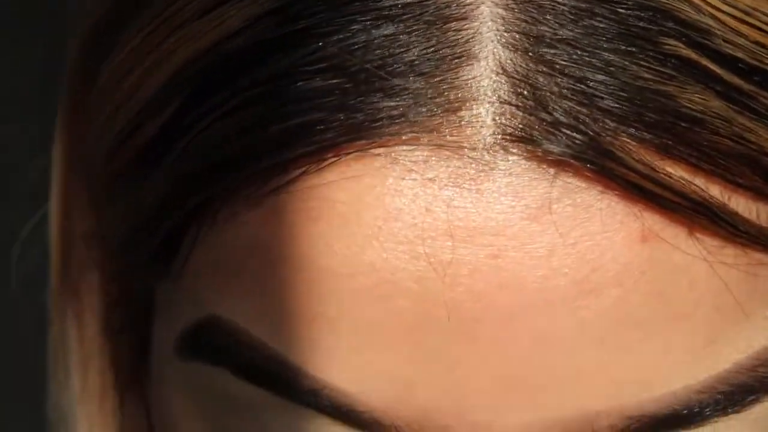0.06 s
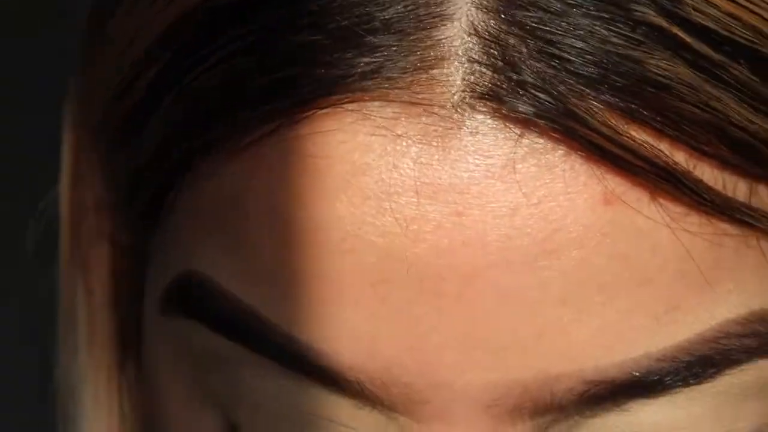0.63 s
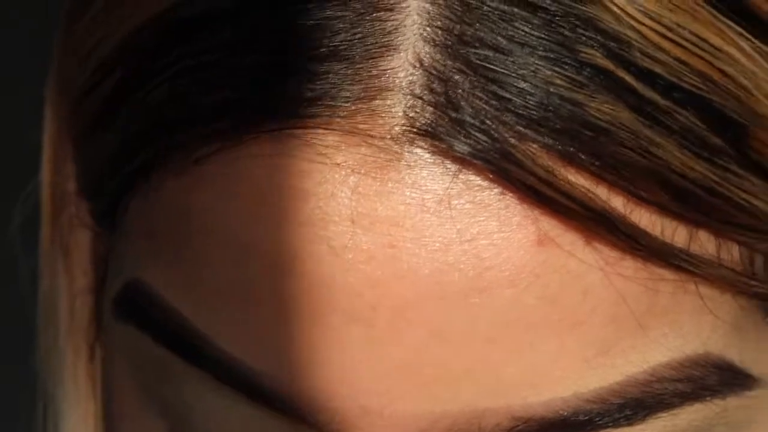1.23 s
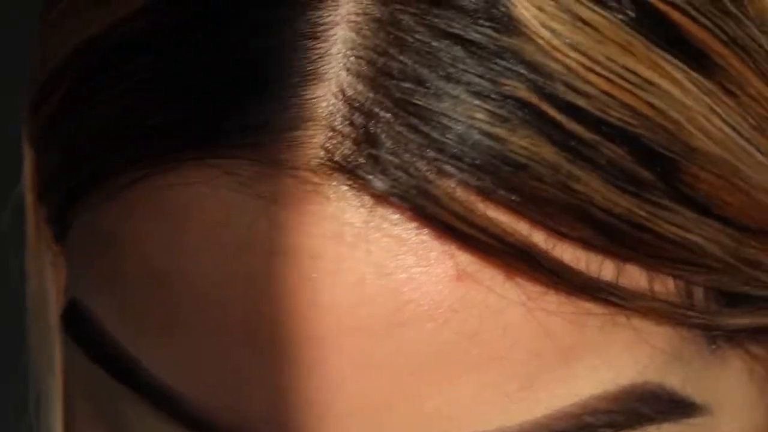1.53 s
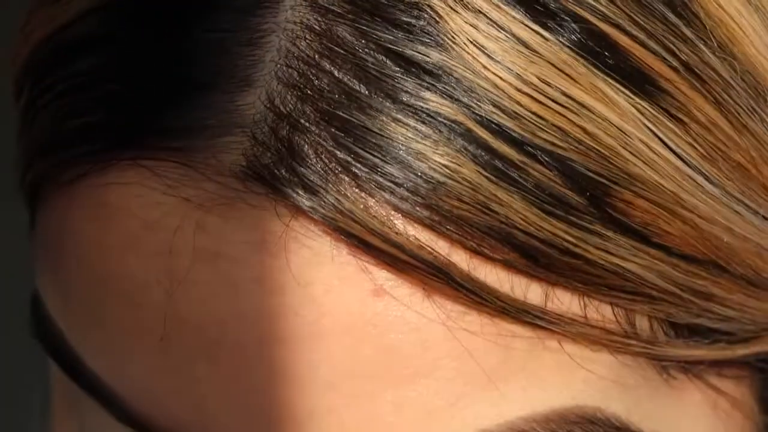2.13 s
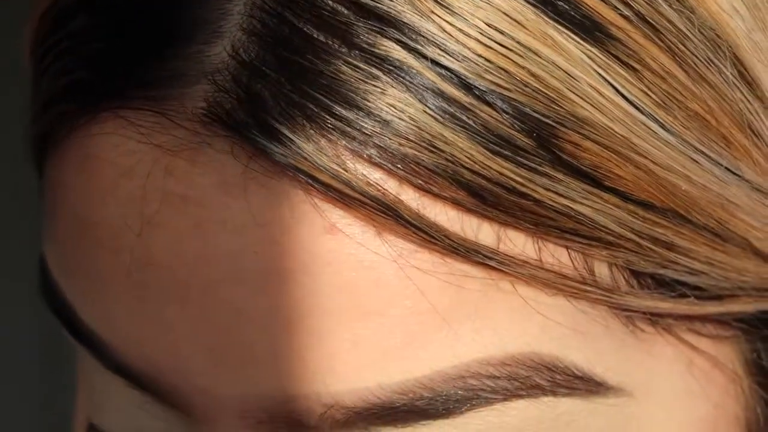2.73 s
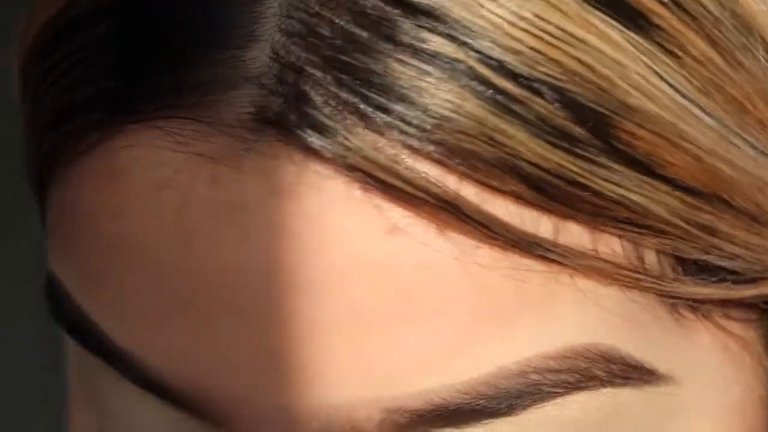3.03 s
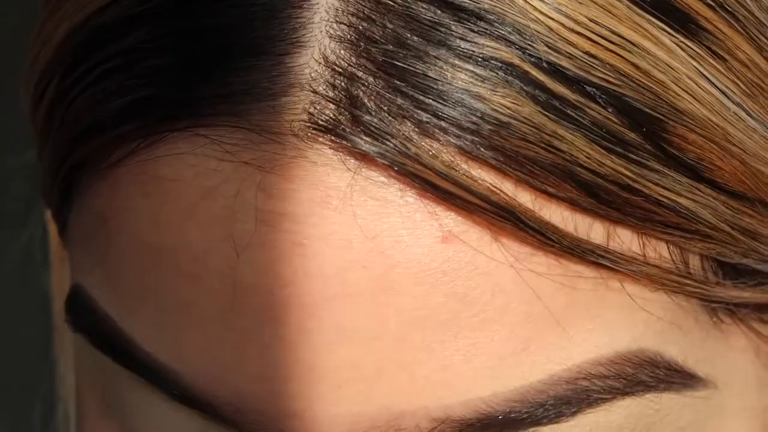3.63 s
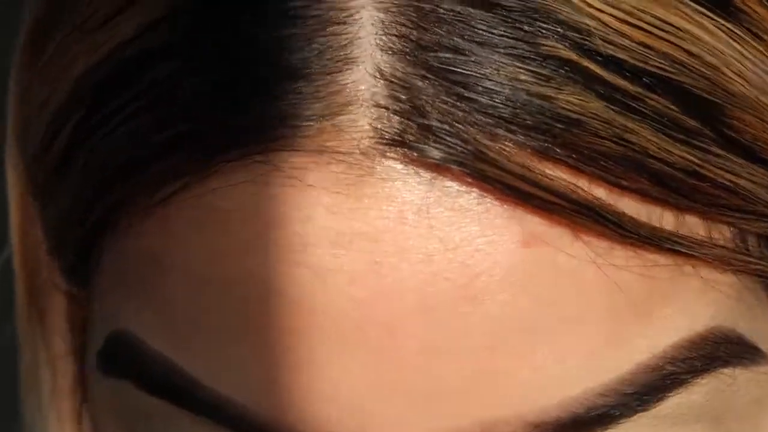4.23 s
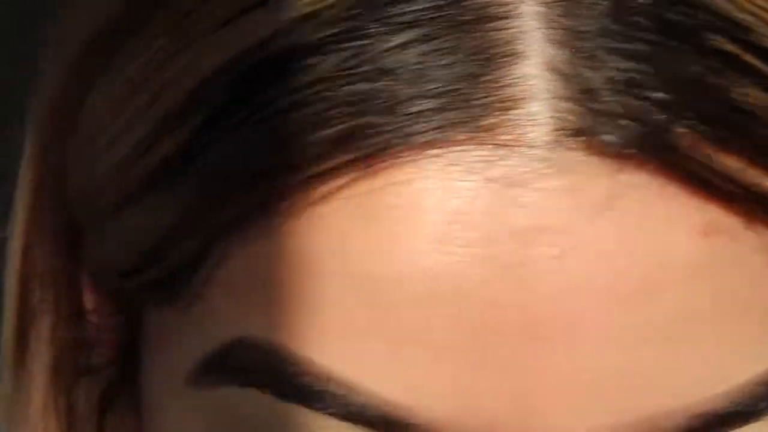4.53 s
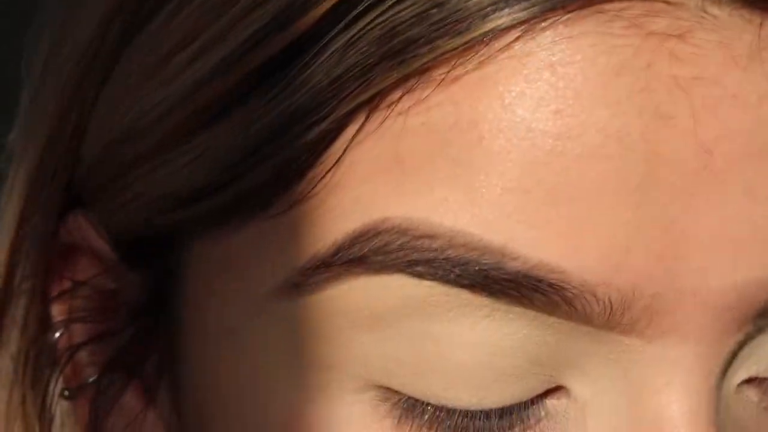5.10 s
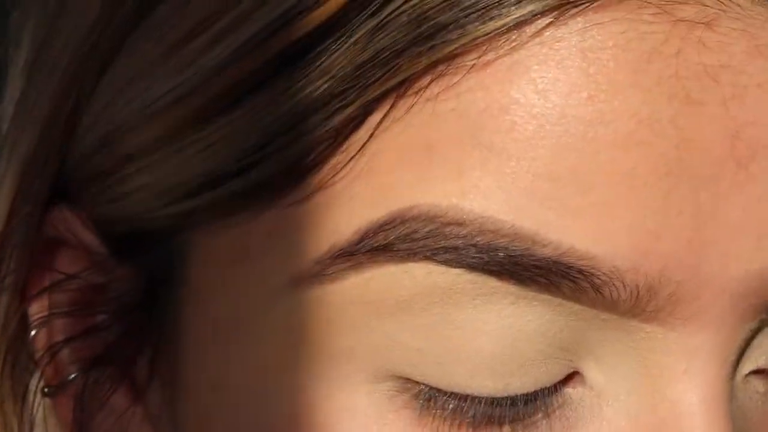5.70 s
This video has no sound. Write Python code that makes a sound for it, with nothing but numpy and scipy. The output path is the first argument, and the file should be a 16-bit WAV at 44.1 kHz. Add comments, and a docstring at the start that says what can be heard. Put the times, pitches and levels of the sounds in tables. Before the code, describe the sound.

Close by in a small, quiet room, plastic make-up cases are rummaged through on a hollow desk. A tub lands with a heavy, booming knock, then a palette clatters down. Cases click together, scrape and squeak as they slide, with soft thuds from the desk. Near the end a lid is tapped and a small jar is set down with a quick double knock, over faint room noise and a low hum.

```python
"""At a hollow desk in a small, quiet room, plastic make-up cases are rummaged through close by.
They click as they meet, and scrape and squeak as they slide; the desk knocks and booms under them.
A tub lands heavily, then a palette clatters down. Near the end a lid is tapped and a small jar is set
down with a double knock. Each rings with its own fading tones, over room noise and a low motor hum.
Stereo is built from a mid signal (what both ears share) and a side signal (how they differ)."""
import sys
import numpy as np
from scipy import signal
from scipy.fft import rfft, irfft, next_fast_len
from scipy.io import wavfile
from scipy.ndimage import uniform_filter1d, map_coordinates

SR = 44100
rng = np.random.default_rng(int(sys.argv[2]) if len(sys.argv) > 2 else 0)


def generate_wav(signal):
    """Clip the signal to [-1, 1] and save it as 16-bit WAV at the path in sys.argv[1]."""
    frames = np.transpose(np.atleast_2d(signal))
    scaled = np.clip(frames, -1, 1) * 32767
    pcm = np.round(scaled).astype(np.int16)
    wavfile.write(sys.argv[1], SR, pcm)


N = 262833
HIT = 16384  # samples in one short sound
HIT_HZ = np.fft.rfftfreq(HIT, 1 / SR)
HIT_T = np.arange(HIT) / SR

# Cases are dragged. Each row: start and length in seconds, then scrape, rumble and swell in dB.
SLIDES = [(0, 0.27, -55.5, -52.5, -4.5), (0.324, 0.049, -36, -34, -5.5), (1.16, 0.25, -54.5, -72, 13),
          (1.411, 0.16, -43.5, -53, -15.5), (1.985, 0.16, -51.5, -71, 10.5),
          (2.221, 0.12, -52.5, -56.5, -2), (2.422, 0.14, -54.5, -60, 11), (2.61, 0.059, -42.5, -45, 8.5),
          (2.749, 0.23, -50, -55, -17), (2.938, 0.3, -48.5, -50.5, -4.5), (3.237, 0.07, -42.5, -69, 3),
          (3.301, 0.044, -42, -40, -6.5), (3.387, 0.097, -39, -60, 6.5), (3.516, 0.026, -56, -70, -5),
          (3.768, 0.19, -69, -49.5, 13.5), (4.015, 0.064, -81, -47.5, -1.5),
          (4.738, 0.063, -60, -45.5, -14), (5.337, 0.42, -55.5, -56.5, -1), (5.67, 0.3, -64, -62, -13)]
# The tone colour of a scrape, the desk's rumble and the still room. Each row: frequency in Hz, level in dB.
SCRAPE_COLOUR = [(350, -84.5), (600, 7), (715, -17.5), (785, 0), (1090, 4.5), (1480, 3), (2790, 0.5),
                 (4770, -13), (5180, -12.5), (8640, -21), (10700, -33.5), (12100, -27), (15000, -36.5)]
RUMBLE_COLOUR = [(30, -49), (70, -2.5), (125, 6), (190, -7), (280, 2), (400, -3.5), (560, -9.5),
                 (800, -16.5), (1500, -57), (5000, -71)]
AIR_COLOUR = [(12, -25), (25, 2.5), (42, 0), (59, 0.5), (103, -8.5), (270, -10), (433, -12), (497, -11),
              (555, -16.5), (1310, -20), (1420, -20.5), (1730, -22.5), (2410, -24.5), (3860, -26.5),
              (11800, -42), (13000, -50), (14500, -65)]
# Sliding cases catch and sing. Each row: start and length in seconds, first pitch in Hz, level in dB.
SQUEAKS = [(0.247,0.034,368,-30), (0.29,0.027,356,-30), (0.33,0.053,371,-28.5), (0.419,0.03,557,-22),
           (0.423,0.04,354,-19.5), (0.915,0.05,112,-33), (0.965,0.07,102.8,-43), (1.407,0.033,3510,-34),
           (1.445,0.03,2867,-29.5), (2.631,0.048,1110,-35), (3.308,0.067,3030,-31), (3.387,0.032,1940,-33),
           (3.457,0.03,2340,-32), (3.512,0.045,1392,-36), (3.785,0.06,118,-43), (3.88,0.094,280,-45),
           (4.0,0.026,255,-42), (4.065,0.12,117.7,-42.5), (4.757,0.036,230,-39.5)]
# A case meets the desk or another case. Each row: start in seconds, strength in dB, the case's main
# resonance in Hz, then weight on the desk, hardness and looseness in dB.
CONTACTS = [(0.2511,-10.5,1170,-2.5,3.5,4.5), (.285,-39,2380,-4,18.5,12), (0.298,-27,2400,-6,6,2),
            (0.3129,-14.5,2670,3.5,9.5,2), (0.3182,-7.5,1470,-13,-10,5), (0.33,-14,1350,-6,-2,0),
            (0.338,-12,1000,-13,2,6), (0.382,-15,1300,9.5,2,4.5), (0.3914,6,760,7,-4,-2.5),
            (.4,-1.5,725,-1,-6,1.5), (0.438,-9,930,-26,2.5,4), (0.449,-22,980,12,10,-7),
            (.713,-26,890,-3,-13,-1.5), (0.8734,-1.5,1300,-9,-12,-5), (1.251,-29,2170,-4,-16,7.5),
            (1.328,-20.5,2090,-20,-12,0), (1.356,-1.5,1340,-8.5,-7,-1.5), (1.4007,-16,1040,-9,-2,6),
            (1.4359,1.5,1840,-9,1.5,1), (1.4694,-0.5,1550,-5,8.5,-2), (1.4828,-10,950,-14,-1,5),
            (1.522,-17,1390,-0.5,-17,5), (1.6117,-27.5,2670,-2.5,10,1), (1.975,-29.5,3060,-3,7.5,6.5),
            (1.9881,-7.5,1490,-8,-12,-4), (2.0191,-9.5,1740,-11,3.5,-4.5), (2.043,-19.5,2450,-8,11.5,-4),
            (2.12,-20,1720,-5.5,6.5,-4), (2.151,-25,2200,-8,-8,-12), (2.4957,-19,2250,-11.5,2,-4.5),
            (2.539,-24.5,1700,-20,9,-4), (2.584,-26.5,2330,-7,12.5,13), (2.59,-14.5,2460,-9.5,2.5,-2),
            (2.599,-25,2000,0,8,-2), (2.6376,-19,1710,-12,9,3), (2.665,-19,1150,-10,3,-3),
            (2.7612,-8.5,1720,-15,0,-2), (2.8117,-10.5,1460,-14,4.5,-5), (2.8728,-34,2000,1,0,-8),
            (2.966,-16,1940,-7.5,-13,-1), (2.999,-25,1700,-6,-2,-1), (3.0713,-4.5,1540,-13.5,2.5,-0.5),
            (3.164,-22.5,1980,-10,-15,3), (3.2081,-14,2440,-5.5,3,-4), (3.2694,-21,2320,-26,7,5),
            (3.3,-11.5,1810,-9,11,2.5), (3.3174,-3,2130,-17,-12,-0.5), (3.335,-15.5,1500,2.5,9,-6),
            (3.375,-19.5,2000,-5,8.5,3), (3.4364,-25,1700,-4,9,3), (3.471,-28,2300,-2,-2,6),
            (3.482,-20,2220,-12,7,6.5), (3.5092,-14,1440,-29,-2,3.5), (3.529,-21.5,1730,-19,6,5),
            (3.55,-13.5,1210,-1.5,1,3), (3.996,-28,2220,-9,6.5,-1.5), (4.155,-28,1220,-10,-1,-5),
            (4.4659,-21,520,14.5,-18.5,0), (4.477,-10.5,1020,-5.5,1.5,5.5), (4.602,-23,520,12,4,4.5),
            (4.617,-6.5,2440,-2,9,0), (4.624,-17,1060,9,-10,0.5), (4.731,-31.5,1340,5,-17,-15),
            (5.106,-32.5,1890,-2,-2,-4), (5.332,-26.5,940,-24,-1.5,3.5), (5.38,-34,2700,-1,19,5.5),
            (5.408,-29.5,2530,-2,13,1), (5.5779,-6,940,-9,-5,2), (5.583,-4.5,1100,-3.5,9,-0.5),
            (5.5884,-14,1250,5.5,-1,-17), (5.8863,-34,2800,4.5,19.5,1)]
# The tone colour of each struck part. Each row: frequency in Hz, level in dB.
DESK_THUMP = [(25, 1), (65, 8.5), (125, 9.5), (200, -3), (330, -22), (1200, -91)]
DESK_KNOCK = [(90, -50), (190, -8), (250, 1.5), (340, 2), (410, -1), (560, -2), (760, -3), (1300, -46),
              (5000, -74)]
CASE_SHELL = [(200, -37), (700, 4.5), (1200, 5.5), (2000, 4.5), (3000, -5), (4500, -19), (9000, -66)]
CASE_RIM = [(900, -41), (1900, -3), (2500, 5.5), (3300, 1), (4200, -6.5), (5500, -18), (9000, -74),
            (16000, -75)]
CASE_EDGE = [(2500, 2), (4800, 0), (6500, -3), (8500, -11.5), (10500, -16), (13000, -15.5), (14500, -21),
             (15500, -40)]
# Modes are the tones a struck thing rings with. Each row: pitch in Hz, level in dB, ring time in seconds.
# Ring time (t60) is how long a sound takes to fade by 60 dB.
DESK_MODES = [(133, -5, 0.16), (248.6, 3, 0.11), (342, 0.5, 0.27), (467, 3, 0.19), (512, -7, 0.2),
              (582, -0.5, 0.18), (721, -5, .1), (883, 0.5, 0.12), (1053, -1, 0.13)]
TUB_MODES = [(718, -23.5, 0.088), (885, -26, 0.14), (1380, -23.5, 0.05), (1580, -36, 0.05),
             (1703, -27.5, 0.11), (2020, -34, 0.084), (2850, -30, 0.08)]
PALETTE_MODES = [(644, -40, 0.071), (1082, -19.5, 0.1), (1250, -35, 0.084), (1425, -22, 0.075),
                 (1610, -30, 0.12), (2080, -35, 0.046), (2460, -27.5, 0.098), (2850, -44, .1),
                 (3300, -24, 0.072)]
LID_MODES = [(462, -25.5, 0.046), (574, -20, 0.022), (2025, -31.5, 0.041), (2460, -37, 0.045),
             (2670, -29.5, 0.052), (3300, -25.5, 0.026)]
JAR_MODES = [(325, -2, 0.073), (469, 2, 0.13), (675, 13.5, 0.035), (688, -1.5, 0.15), (745, 4.5, 0.07),
             (940, -8, 0.063), (1068, 15.5, 0.15), (1093, 15.5, 0.049), (1200, -8, 0.16),
             (1255, 8.5, 0.074), (1421, -25, 0.14), (1920, -8, 0.054), (2050, -16, .12), (2185, -5, 0.054),
             (2580, -2, 0.037), (2975, -4, 0.078), (3060, -8, 0.053), (3327, -16, 0.19)]
# The knocks each thing takes. Each row: start in seconds, strength in dB.
TUB_BLOWS = [(0.2527, -14.5), (0.3184, -2), (0.338, -5.5), (0.395, 2)]
PALETTE_BLOWS = [(1.4375, -4.5), (1.4718, -3), (1.523, -14.5)]
LID_TAPS = [(5.381, 0.5), (5.3892, -18), (5.408, -11)]
# The jar's knocks. Each row: start in seconds, strength in dB, lowest pitch that rings well in Hz.
JAR_BLOWS = [(5.579, -19.5, 1000), (5.5832, -23, 300), (5.718, -39, 2850)]
# Single ringing tones. Each row: start in seconds, pitch in Hz, level in dB, ring time in seconds.
CASE_PINGS = [(0.2536,1350,-12.5,0.015), (0.395,526,-14,0.085), (0.395,578,-14,0.074),
              (0.8755,1230,-24,0.022), (0.8742,1880,-21,0.019), (1.3594,1098,-16,0.059),
              (1.47,580,-17.5,0.053), (1.47,483,-22,0.066), (1.614,3520,-49,0.18), (1.619,1114,-30,0.043),
              (1.652,256.5,-34.5,0.097), (3.074,1880,-43,.025), (3.21,1113,-36,0.085),
              (3.32,2170,-21,0.027), (3.319,1833,-14,0.029), (3.323,1040,-25.5,0.072),
              (3.511,1370,-19,0.036), (4.619,4300,-33,.09), (4.617,3100,-26,0.019),
              (4.618,2470,-10.5,0.017), (4.619,5200,-29,.012), (4.619,1066,-26,0.11),
              (5.5833,5430,-23.5,.008)]
DESK_BOOMS = [(0.393, 146, -4, 0.11), (0.396, 249, -14.5, 0.14), (0.397, 346, -29, 0.093),
              (0.88, 117.6, -22.5, 0.28), (0.885, 241, -32, 0.14), (5.583, 152, -35, 0.17),
              (4.732, 254, -29.5, 0.17), (4.732, 524, -48, .15), (4.732, 140, -39, .2),
              (4.745, 78, -31.5, 0.31)]
# An edge or clasp catches. Each row: start in seconds, level in dB.
CRACKS = [(0.313,-18.5), (.397,-12.5), (1.9874,-32.5), (2.021,-26.5), (2.042,-42), (3.073,-25),
          (4.615,-24.5), (5.583,-14), (5.5887,-17), (5.886,-27.5)]
# The desk is nudged. Each row: start in seconds, thud in dB, hollow note's pitch in Hz and level in dB.
BUMPS = [(2.206, -36.5, 260, -37.5), (2.298, -60, 357, -38.5), (2.389, -47, 161, -54),
         (2.59, -34, 214, -36), (2.616, -29, 245, -30), (2.67, -29, 257, -46), (2.696, -36, 170, -39),
         (2.763, -35.5, 236, -34.5), (2.961, -50, 243, -32), (2.998, -46, 251, -31.5),
         (3.073, -40, 253, -28), (3.088, -30, 148, -45), (3.189, -25.5, 150, -43), (3.211, -35, 174, -39),
         (3.331, -36, 276, -29), (3.433, -51, 346, -32), (3.858, -52, 248, -42), (3.956, -31, 290, -42),
         (4.05, -47, 250, -45), (4.471, -36, 202, -20), (4.607, -20.5, 205, -30), (4.627, -23, 239, -24)]
# How the room's echo dies away. Each row: frequency in Hz, ring time in seconds.
ROOM_DECAY = [(100, 0.37), (300, 0.21), (800, 0.24), (2500, 0.21), (6000, 0.25), (13000, 0.088)]
# Up close, the bass is mostly direct sound. Each row: frequency in Hz, gain of chatter and room in dB.
SCATTER_GAIN = [(80, -6.5), (250, -2), (700, -2.5)]
# Stereo width of the handling and of the room noise. Each row: frequency in Hz, side gain in dB.
NEAR_WIDTH = [(60, -36), (250, -24), (1000, -20), (2500, -16), (4200, -5), (6500, -1), (9000, 3),
              (11000, 5.5), (14000, 7)]
AIR_WIDTH = [(60, -55), (110, -11), (200, -5), (380, -1), (700, -0.5), (1290, 0), (2380, 0), (4400, 3),
             (8120, -1), (15000, 12)]


def amp(db):
    """Turn decibels into a gain."""
    return np.exp(np.asarray(db) * (np.log(10) / 20))


def unit(x):
    """Scale to an average power of 1."""
    return x / np.sqrt(np.mean(x ** 2) + 1e-20)


def along(points, hz):
    """Read between the rows of a table, on a log frequency axis."""
    freqs, values = np.transpose(points)
    return np.interp(np.log(hz + 1), np.log(freqs + 1), values)


def wobble(rate):
    """A smooth curve through rate random points a second."""
    return map_coordinates(rng.standard_normal(int(N * rate / SR) + 4), [np.arange(N) * rate / SR])


def filtered(x, response):
    """Give each frequency its own gain."""
    size = next_fast_len(N + 8192)
    return irfft(rfft(x, size) * response(np.fft.rfftfreq(size, 1 / SR)), size)[..., :N]


def sharp_start(gain):
    """The spectrum with these gains whose sound starts sharply and then rings out."""
    cepstrum = irfft(np.log(np.maximum(gain, 1e-6)))
    fold = np.r_[1, np.full(HIT // 2 - 1, 2), 1, np.zeros(HIT // 2 - 1)]
    return np.exp(rfft(cepstrum * fold))


def add(track, start, sound):
    """Mix a short sound into a track at start seconds."""
    part = track[..., round(start * SR):][..., :HIT]
    part += sound[..., :part.shape[-1]]


def ring(hz, db, t60, attack_s, sag=0):
    """One fading tone; it loses the share sag of its pitch as the weight settles."""
    pitch = hz * (1 - sag * (1 - np.exp(-HIT_T / 0.039)))
    tone = np.sin(2 * np.pi * np.cumsum(pitch) / SR)
    return amp(db - 60 * HIT_T / t60) * tone * (1 - np.exp(-HIT_T / attack_s))


def room_tail():
    """The room's echo, mid and side: noise in which each frequency dies at its own speed."""
    hz, t, spectra = signal.stft(rng.standard_normal((2, HIT)), SR, nperseg=256)
    decay = amp(-60 * t / along(ROOM_DECAY, hz)[:, None])
    tail = signal.istft(spectra * decay, SR, nperseg=256)[1][:, :HIT]
    tail = tail * (1 - np.exp(-HIT_T / 0.0026))
    return tail / np.linalg.norm(tail[0])


def stroke(start, length, swell_db, grip_s=0.011, rest_t60=0.31):
    """The gain of one drag: it takes hold, swells or eases steadily, then comes to rest."""
    t = np.arange(N) / SR - start
    progress = np.clip(t / length, 0, 1)
    fade_db = 60 * np.maximum(t - length, 0) / rest_t60
    return np.clip(t / grip_s, 0, 1) * amp(swell_db * (progress - .5) - fade_db)


def friction(colour, slips_per_s, spread_db, smooth):
    """Tiny slips of uneven size over a smooth rub, coloured by the body and spread by the room."""
    slips = rng.random(N) < slips_per_s / SR
    sizes = amp(spread_db * np.minimum(rng.exponential(size=N), 3))
    force = unit(slips * sizes * rng.choice([-1, 1], (2, N))) + smooth * rng.standard_normal((2, N))
    room = amp(0.5) * signal.fftconvolve(force[:1], room_tail(), axes=1)[:, :N]
    return unit(filtered(force + room, lambda hz: amp(along(colour, hz))))


def shifting(x, depth_db):
    """A gripped case's resonances come and go as it moves."""
    spectra = signal.stft(x, nperseg=512)[2]
    patches = uniform_filter1d(rng.standard_normal(spectra.shape[1:]), size=4, axis=0)
    patches = uniform_filter1d(patches, size=5, axis=1)
    return unit(signal.istft(spectra * amp(depth_db * unit(patches)), nperseg=512)[1][:, :N])


def slides():
    """Dragged cases scrape and their loose parts tick, while the desk rumbles under them."""
    scrape_gain, rumble_gain = np.zeros((2, N))
    for start, length, scrape_db, rumble_db, swell_db in SLIDES:
        drag = stroke(start, length, swell_db)
        scrape_gain = np.hypot(scrape_gain, amp(scrape_db) * drag)
        rumble_gain = np.hypot(rumble_gain, amp(rumble_db) * drag)
    rumble = friction(RUMBLE_COLOUR, slips_per_s=270, spread_db=-5, smooth=0.95)
    ticks = amp(-12.5) * friction(CASE_RIM, slips_per_s=110, spread_db=-2, smooth=0.05)
    rub = shifting(friction(SCRAPE_COLOUR, slips_per_s=500, spread_db=3, smooth=0.35), depth_db=3.5)
    catching = amp(1.5 * wobble(70))  # the drag keeps catching and letting go
    return rumble_gain * rumble + scrape_gain * (rub + ticks) * catching


def air(noise_db, drift_db, hum_hz, hum_db):
    """Room noise, mid and side, over the low hum of a distant motor."""
    noise = unit(filtered(rng.standard_normal((2, N)), lambda hz: amp(along(AIR_COLOUR, hz))))
    mid, side = noise * amp(noise_db + drift_db * wobble(13))
    hum_gain = amp(hum_db + 1.1 * wobble(1.9))
    hum = hum_gain * np.sin(2 * np.pi * hum_hz * np.arange(N) / SR + wobble(3.4))
    return np.array([mid + hum, filtered(side, lambda hz: amp(along(AIR_WIDTH, hz)))])


def whine(hz, width_hz, db, fade_db_per_s):
    """A narrow band of noise makes a faint, fading whine in the room."""
    band = unit(filtered(rng.standard_normal(N), lambda f: 1 / (1 + ((f - hz) / width_hz) ** 2)))
    return band * amp(db - fade_db_per_s * np.arange(N) / SR)


def squeaks(rough, sag):
    """A case sticks and slips fast enough to sing; the pitch sinks as it slows."""
    out = np.zeros(N)
    for start, length, start_hz, db in SQUEAKS:
        progress = np.minimum(HIT_T / length, 1)
        phase = 2 * np.pi * np.cumsum(start_hz * (1 - sag * progress)) / SR
        # every slip comes a little early or late
        drift = rough * np.cumsum(rng.standard_normal(HIT)) * np.sqrt(start_hz / SR)
        jitter = signal.lfilter(*signal.butter(2, start_hz / 2, fs=SR), drift)
        add(out, start, amp(db) * np.sin(np.pi * progress) * np.sin(phase + jitter))
    return out


def strike(chatter_db, room_db, chatter_t60, echo_s, echo_db, graze_s=0.00131):
    """Mid and side spectra of one touch: a graze, the push, chatter, a nearby echo, then the room."""
    chatter = rng.standard_normal((2, HIT)) * amp(-60 * HIT_T / chatter_t60)
    chatter *= 1 - np.exp(-HIT_T / 0.0015)
    scatter = amp(chatter_db) * chatter / np.linalg.norm(chatter[0]) + amp(room_db) * room_tail()
    push = np.array([[1], [.7j]])  # the side follows the pressure's slope, a quarter cycle apart
    echo = 1 + amp(echo_db) * np.exp(-2j * np.pi * HIT_HZ * echo_s * rng.uniform(0.801, 1.15))
    graze = rng.standard_normal((2, HIT)) * np.sin(np.pi / 2 * np.minimum(HIT_T / graze_s, 2))
    blow = push * echo + rfft(scatter) * amp(along(SCATTER_GAIN, HIT_HZ))
    delay = np.exp(-2j * np.pi * HIT_HZ * graze_s)
    return amp(-7.5) * rfft(graze / np.linalg.norm(graze[0])) + blow * delay


def swing_up(hz, q):
    """A resonance of sharpness q holds a push back briefly without changing its strength."""
    return np.exp(-2j * np.arctan(q * (HIT_HZ / hz - hz / (HIT_HZ + 1))))


def contacts(rim_hz):
    """Each contact shares its energy between the desk and the case's hollow shell, rim and edge."""
    out = np.zeros((2, N))
    colours = DESK_THUMP, DESK_KNOCK, CASE_SHELL, CASE_RIM, CASE_EDGE
    thump, knock, shell, rim, edge = [unit(amp(along(colour, HIT_HZ))) for colour in colours]
    for start, db, clack_hz, weight_db, hard_db, loose_db in CONTACTS:
        detune = HIT_HZ / clack_hz - clack_hz / (HIT_HZ + 1)
        clack = unit(shell / np.hypot(1, detune))
        # a harder contact is shorter: less thump, more click and tick
        thud = amp(weight_db) * np.hypot(knock, amp(-7 - 0.63 * hard_db) * thump)
        click = amp(-8 + hard_db) * rim
        tick = amp(-30 + 0.72 * hard_db - 0.5 * db) * edge  # heavy blows sink in and dull the edge
        body = sharp_start(np.linalg.norm([thud, clack, click, tick], axis=0))
        # a loosely held case chatters and spills into the room
        touch = strike(loose_db, loose_db + 2.04, chatter_t60=0.04, echo_s=0.0055, echo_db=-7)
        sound = amp(db) * irfft(body * touch * swing_up(rim_hz, q=3) * swing_up(clack_hz, q=1.5))
        fade = np.cos(np.pi / 2 * np.arange(HIT) / HIT)
        add(out, start, sound * fade)
    return out


def desk():
    """The desk rings on after each contact, as strongly as the weight that lands on it."""
    out = np.zeros(N)
    modes = np.array([ring(hz, db, t60, attack_s=0.00073) for hz, db, t60 in DESK_MODES])
    for start, db, _, weight_db, _, _ in CONTACTS:
        # each lands on another spot, so the modes mix differently
        shares = rng.choice([-1, 1], len(modes)) * amp(rng.normal(0, 1.9, len(modes)))
        add(out, start, amp(-34 + db + weight_db) * (shares @ modes))
    return out


def knocked(blows, modes, spread_db, attack_s):
    """Every blow rings all the modes, each with a random sign and a slightly random level."""
    out = np.zeros(N)
    for start, blow_db in blows:
        for hz, db, t60 in modes:
            sign = rng.choice([-1, 1])
            add(out, start, sign * ring(hz, blow_db + db + rng.normal(0, spread_db), t60, attack_s))
    return out


def tub():
    """A hollow plastic tub rings as it is jostled and then lands."""
    return knocked(TUB_BLOWS, TUB_MODES, spread_db=0.74, attack_s=0.00094)


def pings():
    """Small parts of a struck case ring on."""
    out = np.zeros(N)
    for start, hz, db, t60 in CASE_PINGS:
        add(out, start, ring(hz, db, t60, attack_s=0.00068))
    return out


def cracks():
    """Hard edges and clasps catch with a bright crack."""
    out = np.zeros((2, N))
    edge = sharp_start(unit(amp(along(CASE_EDGE, HIT_HZ))))
    for start, db in CRACKS:
        touch = strike(chatter_db=8.5, room_db=6.5, chatter_t60=0.12, echo_s=0.0058, echo_db=-20)
        add(out, start, amp(db) * irfft(edge * touch))
    return out


def booms():
    """Heavy blows leave the desk booming with low, sinking tones."""
    out = np.zeros(N)
    for start, hz, db, t60 in DESK_BOOMS:
        add(out, start, ring(hz, db, t60, attack_s=0.0029, sag=0.13))
    return out


def palette():
    """A palette clatters down among the cases, ringing at each knock."""
    return knocked(PALETTE_BLOWS, PALETTE_MODES, spread_db=1.5, attack_s=0.00041)


def bumps(thud_hz):
    """A hand or a case's weight softly nudges the desk: a low thud and a hollow note."""
    out = np.zeros(N)
    for start, thud_db, hollow_hz, hollow_db in BUMPS:
        thud = ring(thud_hz, thud_db, t60=0.058, attack_s=0.0031, sag=0.1)
        hollow = ring(hollow_hz, hollow_db, t60=0.067, attack_s=0.0031, sag=0.065)
        add(out, start, thud + hollow)
    return out


def lid():
    """A tapped lid bounces and rings briefly each time."""
    out = np.zeros(N)
    for start, tap_db in LID_TAPS:
        for hz, db, t60 in LID_MODES:
            add(out, start, ring(hz, tap_db + db + rng.normal(0, 1.5), t60, attack_s=0.0015))
    return out


def jar():
    """A small jar rings as it lands on one edge, then flat, and settles."""
    out = np.zeros(N)
    for start, blow_db, lowest_hz in JAR_BLOWS:
        for k, (hz, db, t60) in enumerate(JAR_MODES):
            share = (-1) ** k / np.hypot(1, (lowest_hz / hz) ** 4)  # neighbours swing opposite ways
            add(out, start, share * ring(hz, blow_db + db + rng.normal(0, 1), t60, attack_s=0.00029))
    return out


def scene():
    """Mix handling and room into left and right; the bass is central and the treble wide."""
    handling = contacts(rim_hz=2500)
    handling[0] += desk() + booms() + bumps(thud_hz=90.4)  # row 0 is the mid signal
    handling += cracks()
    handling[0] += pings() + lid() + palette() + jar() + tub()
    handling += slides()
    handling[0] += squeaks(rough=0.44, sag=0.0765)
    handling[1] = filtered(handling[1], lambda hz: amp(along(NEAR_WIDTH, hz)))
    mid, side = handling + air(noise_db=-52.5, drift_db=1.07, hum_hz=41.5, hum_db=-53.5)
    mid += whine(hz=2320, width_hz=410, db=-58, fade_db_per_s=3.5)
    return np.array([mid + side, mid - side])


def gain_control(x, threshold_db, slope, recovery_db_per_s):
    """Loud knocks in the left channel turn both channels down; the level then creeps back."""
    level_db = 10 * np.log10(np.abs(uniform_filter1d(x[0] ** 2, size=882)) + 1e-12)
    ramp = recovery_db_per_s * np.arange(N) / SR
    cut_db = np.maximum.accumulate(slope * np.maximum(level_db - threshold_db, 0) + ramp) - ramp
    return x * amp(-signal.lfilter(*signal.butter(1, 4, fs=SR), cut_db))


def record(dry):
    """Dip after loud knocks, drop the deepest bass, clip at full scale and cut the highest treble."""
    ducked = gain_control(dry, threshold_db=-15, slope=0.49, recovery_db_per_s=3.5)
    thinned = signal.sosfilt(signal.butter(4, 37, "high", fs=SR, output="sos"), ducked)
    return filtered(np.clip(thinned, -1, 1), lambda hz: hz < 15600)


dry = scene()
out = record(dry)
generate_wav(out)
```